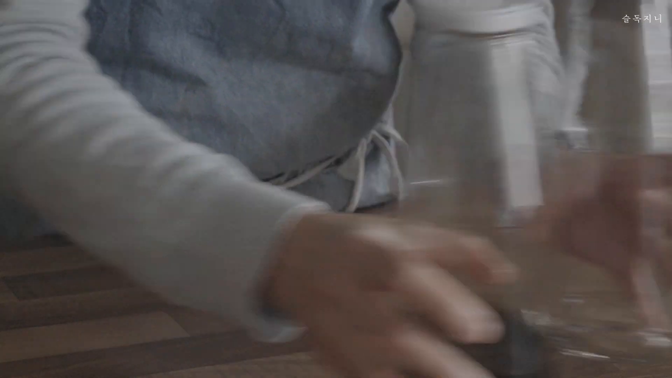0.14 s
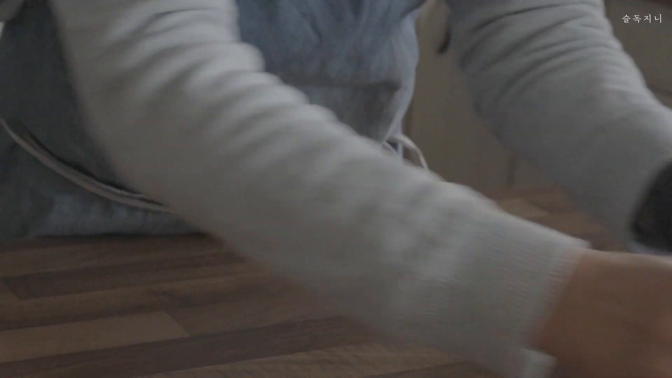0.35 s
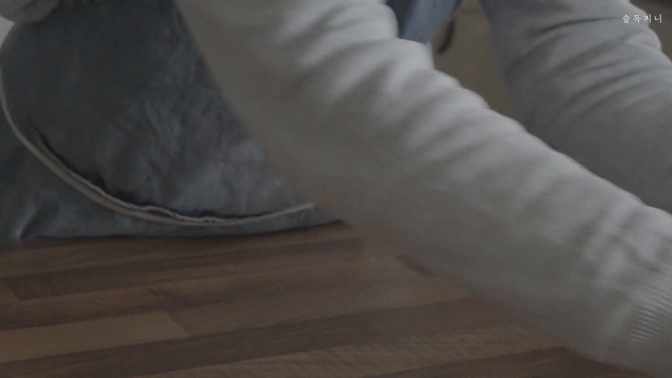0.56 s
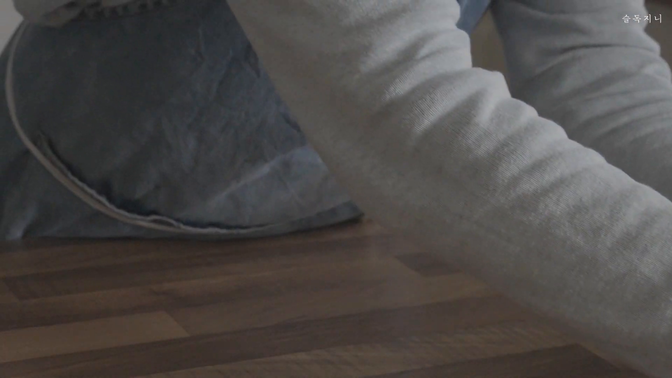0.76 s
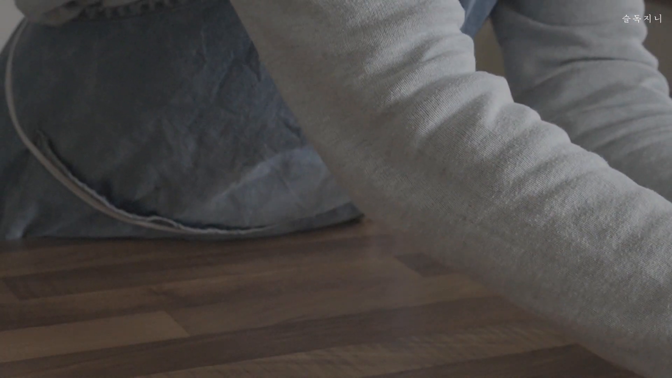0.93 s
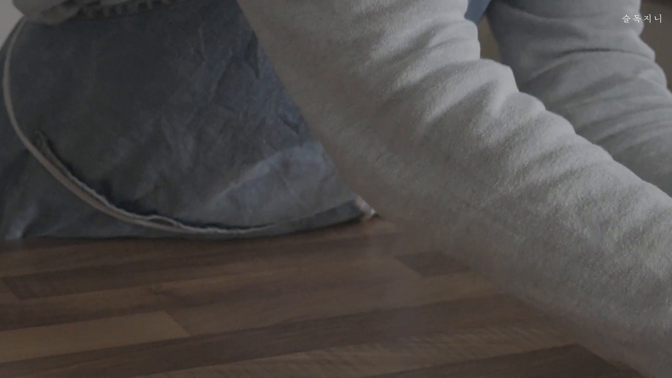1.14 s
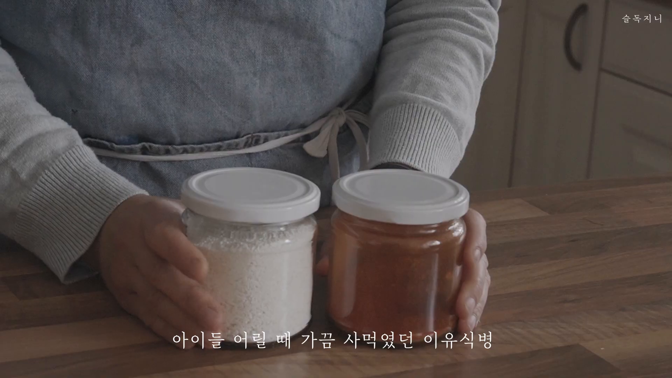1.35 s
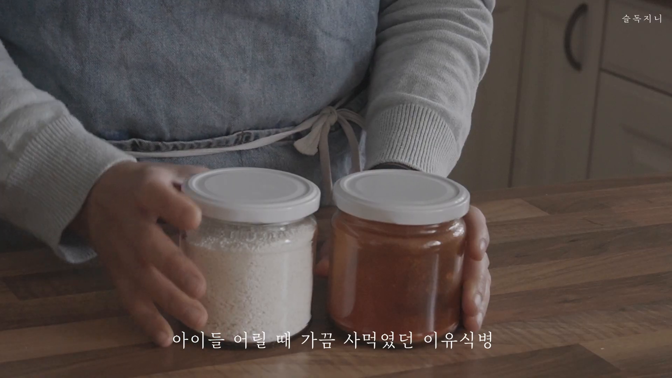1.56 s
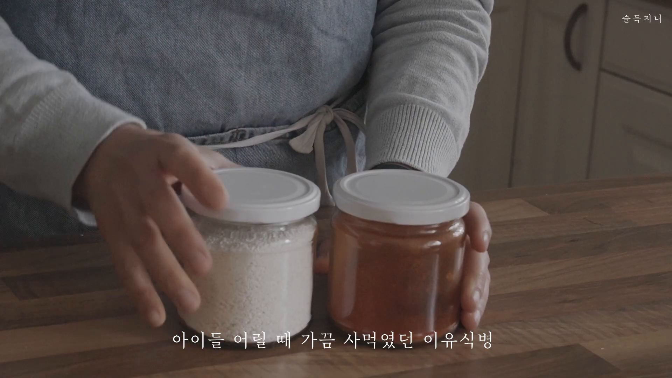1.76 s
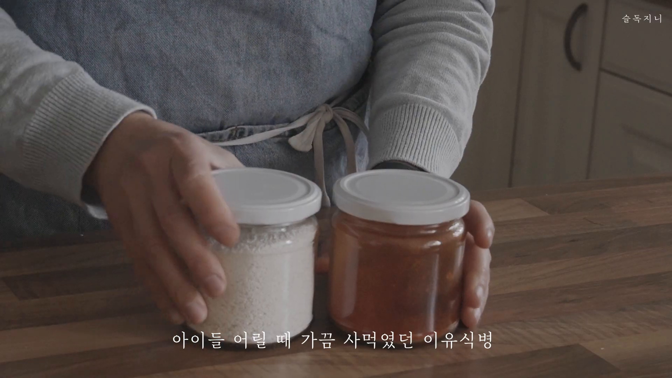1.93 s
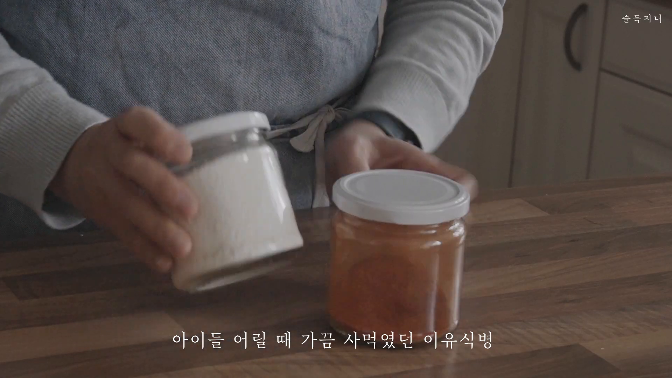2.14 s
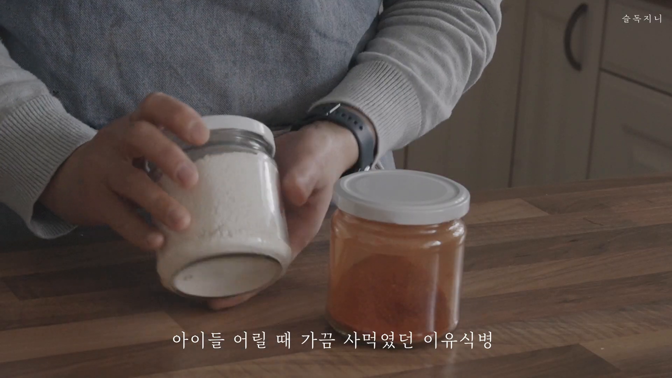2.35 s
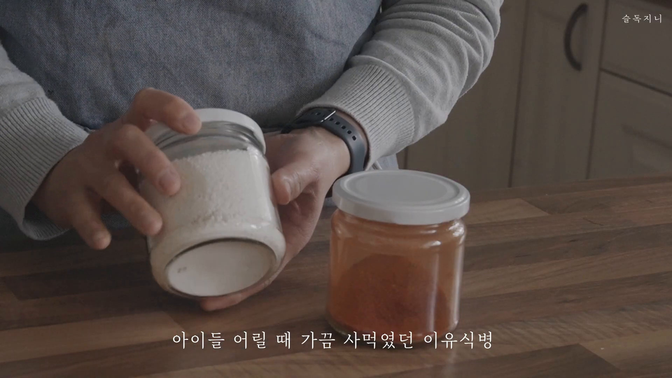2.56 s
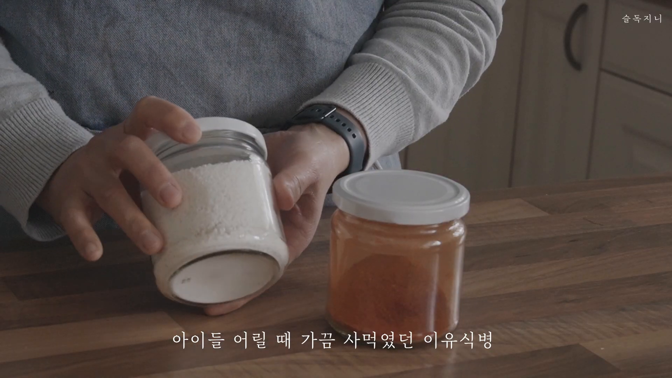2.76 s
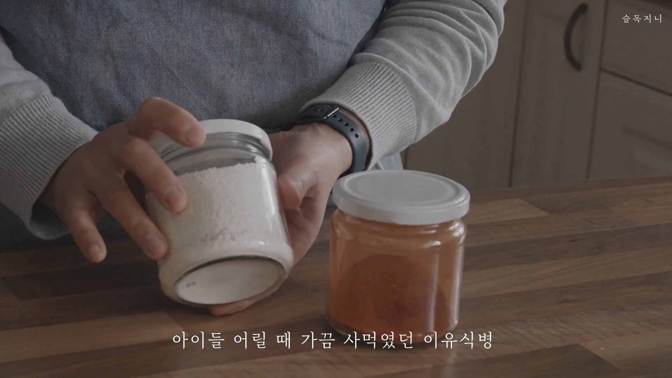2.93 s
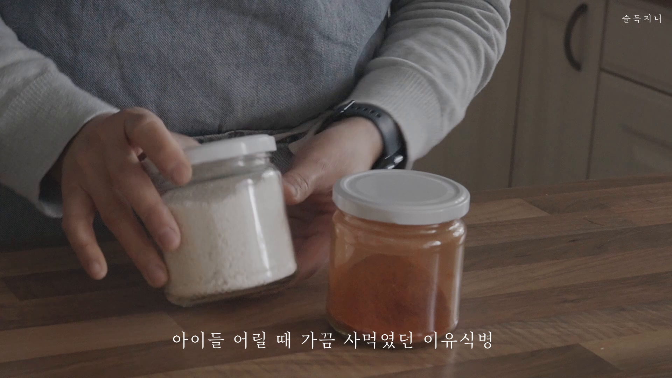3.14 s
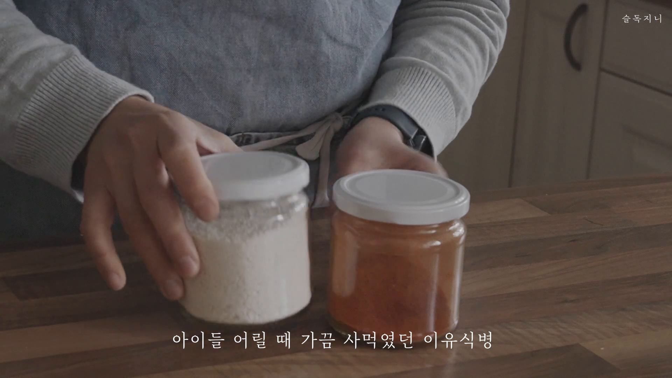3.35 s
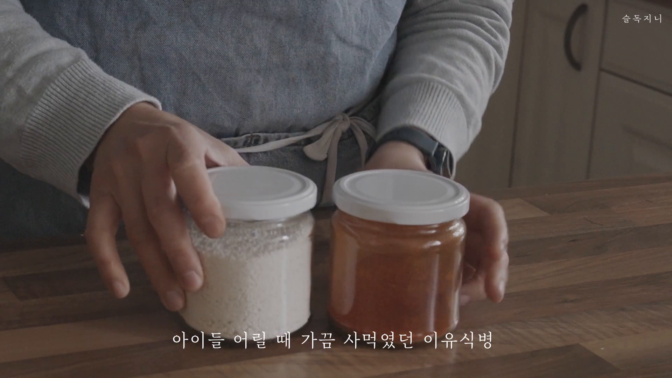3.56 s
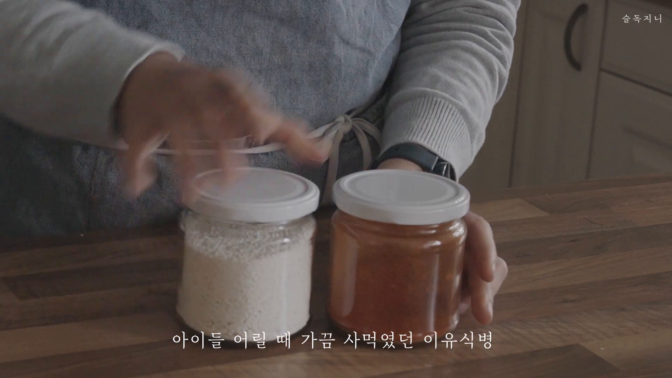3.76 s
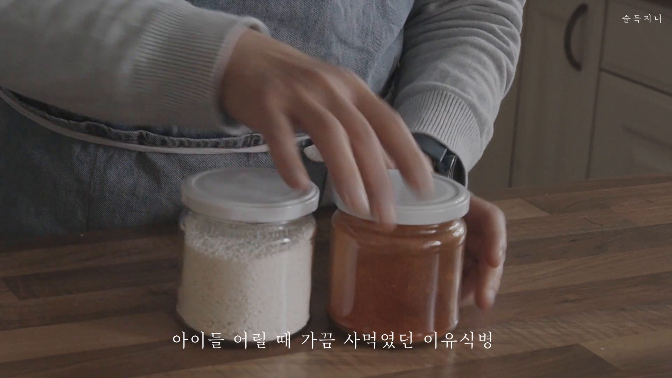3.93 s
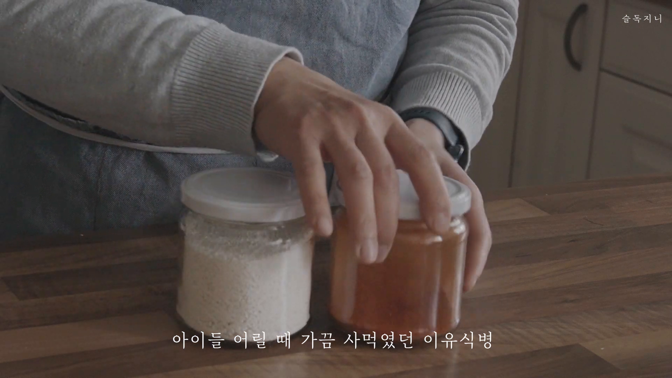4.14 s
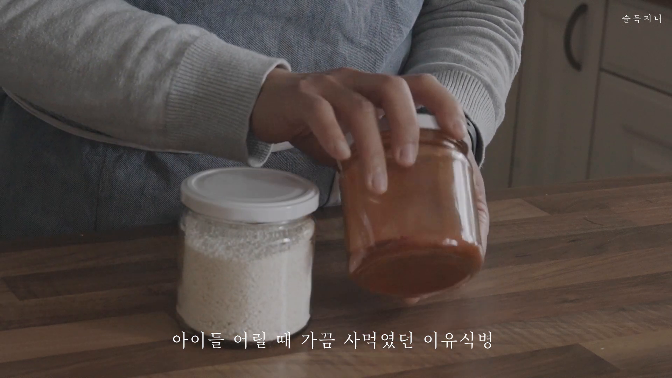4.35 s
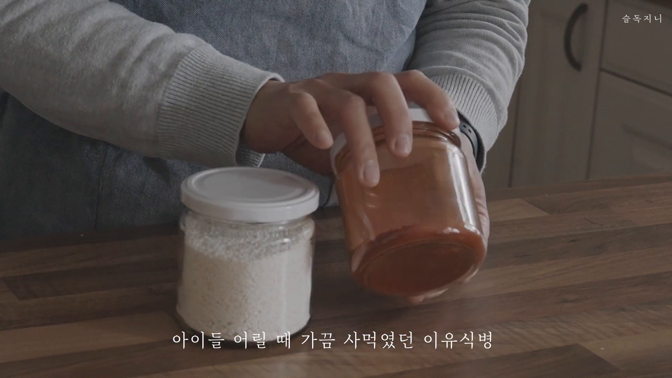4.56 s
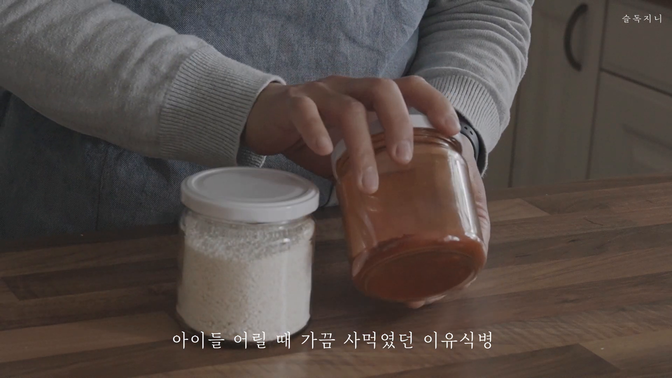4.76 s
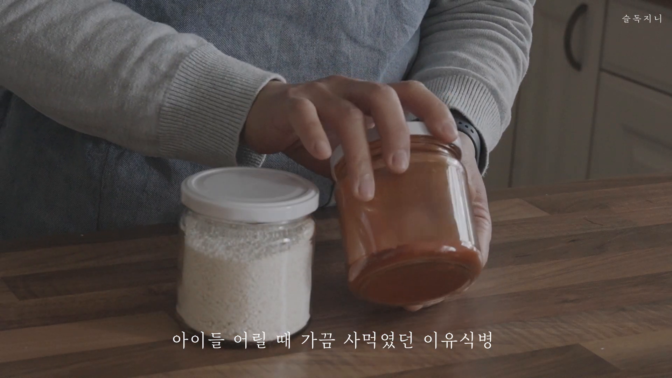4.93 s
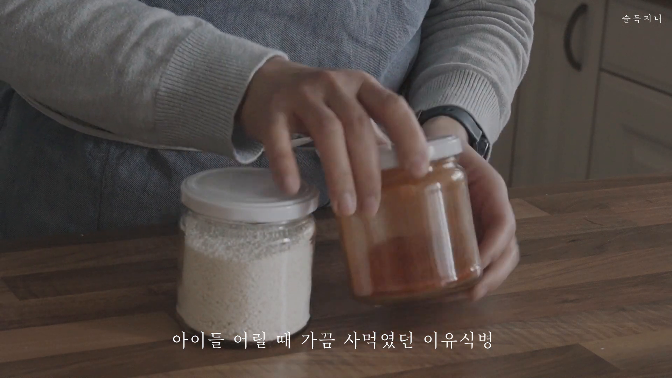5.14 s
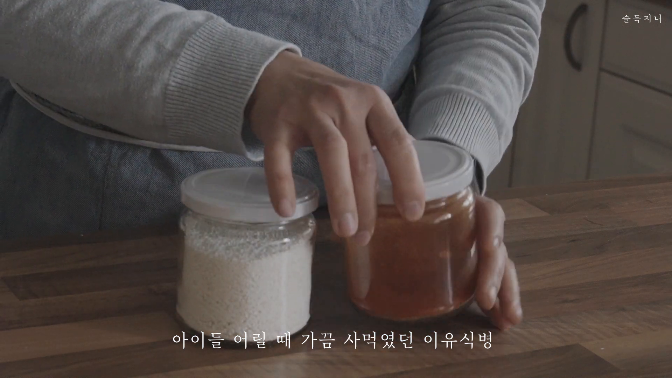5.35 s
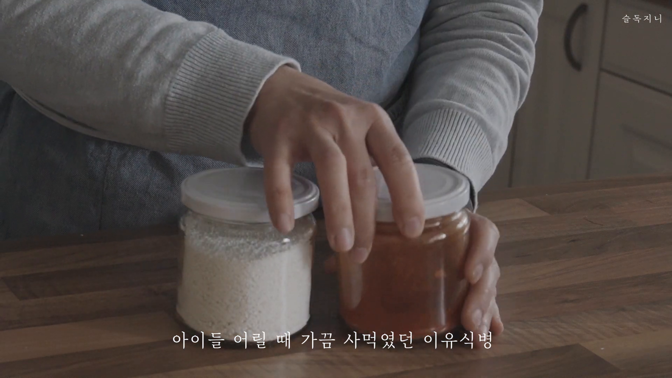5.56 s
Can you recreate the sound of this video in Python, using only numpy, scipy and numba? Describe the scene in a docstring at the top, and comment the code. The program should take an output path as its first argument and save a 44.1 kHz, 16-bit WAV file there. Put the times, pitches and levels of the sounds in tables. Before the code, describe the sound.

Glass bottles are moved and set down on a wooden kitchen counter, close to the microphone. A soft bump and a sleeve swish lead to a cluster of hard knocks, short scrapes and thin clinks. Lighter taps and fingertip brushing follow as a jar is handled. Then come two loud knocks in quick succession, a few softer scrapes and bumps, and faint cloth rustle in the small, quiet room.

```python
"""Glass bottles and jars knock, some hard, and scrape on a wooden kitchen counter, close to the microphone.
They are set down, slid and picked up: each landing thumps the worktop, rings its modes,
fills the small room and rocks to rest. Between landings, glass clinks, fingertips hiss and
sleeves swell with each reach. The hardest knocks overload the microphone; its limiter ducks and recovers.
"""
import sys
import numpy as np
from scipy import signal
from scipy.fft import rfft, irfft
from scipy.io import wavfile
from numba import njit

SR = 44100
rng = np.random.default_rng(int(sys.argv[2]) if len(sys.argv) > 2 else 0)


def waveform_to_disk(signal):
    """Save audio, clipped to [-1, 1], as 16-bit WAV at the path in sys.argv[1]."""
    frames = np.transpose(np.atleast_2d(signal))
    scaled = np.clip(frames, -1, 1) * 32767
    samples = np.round(scaled).astype(np.int16)
    wavfile.write(sys.argv[1], SR, samples)


N = 246959
RING_SIZE = 32768  # samples given to one contact to ring out
TIME, AGE = np.arange(N) / SR, np.arange(RING_SIZE) / SR  # seconds into the scene, into a contact

# modes that a blow on the worktop sets ringing: the worktop and the cupboard under it, with the long ring of a
# bottle near 282 Hz and of a jar near 391 Hz: pitch_hz, level_db, t60_s
RINGING_MODES = [(83, -19, 0.6), (154.6, 6, 0.24), (232, 6, 0.63), (282.4, 3.5, 0.63), (282.7, 7.5, 0.15),
                 (391.3, 10, 0.38), (460, -18, 0.1), (508, 0.5, 0.5), (527, -2, 1), (626, 9, 0.2),
                 (647, 24, 0.36), (720, 2, 0.42), (812, -4, 0.56), (990, 14, 0.36), (910, -13, 0.99),
                 (1250, 5.5, 0.27)]
# spectrum of a hard tap on the wood: frequency_hz, level_db
WOOD_SPECTRUM = [(40, -20), (90, -3.5), (180, -6), (260, 3), (650, 3), (1000, 1.5), (1350, -4),
                 (1700, -8.5), (2250, -3.5), (3000, -15), (4800, -19), (8000, -23), (15000, -46)]
# tone of the kitchen's echoes: frequency_hz, gain_db
ROOM_SPECTRUM = [(60, -0.5), (300, 3), (1000, 2), (1600, -2), (2300, -9), (3200, -3.5), (5000, 4),
                 (14000, 23)]


def undb(db):
    """Decibels to amplitude."""
    return 10 ** (np.asarray(db) / 20)


def unit(x):
    """Scaled to an energy of one."""
    return x / np.sqrt(np.sum(x ** 2))


def read(points, hz):
    """Rows of frequency_hz, value joined by straight lines over log frequency."""
    frequencies, values = np.transpose(points)
    return np.interp(np.log(np.maximum(hz, 1)), np.log(frequencies), values)


def colour(x, spectrum):
    """Filter by rows of frequency_hz, gain_db."""
    return irfft(rfft(x) * undb(read(spectrum, np.fft.rfftfreq(len(x), 1 / SR))), len(x))


def noise(spectrum):
    """Coloured noise of rms one."""
    return unit(colour(rng.standard_normal(N), spectrum)) * np.sqrt(N)


def wander(rate_hz):
    """A random drift with a spread near one."""
    knots = rng.standard_normal(N // 100)
    return np.interp(TIME * rate_hz, np.arange(len(knots)), knots)


def swell(centre_s, length_s):
    """A movement speeds up and slows down again: a bell curve."""
    return np.exp(-2 * ((TIME - centre_s) / length_s) ** 2)


def add(out, start_s, x):
    """Mix x in from start_s."""
    i = max(int(start_s * SR), 0)
    out[i:i + len(x)] += x[:N - i]


def tap(spectrum):
    """The shortest causal pulse that has this spectrum."""
    cepstrum = irfft(np.log(undb(read(spectrum, np.fft.rfftfreq(RING_SIZE, 1 / SR)))))
    cepstrum[1:RING_SIZE // 2] *= 2
    cepstrum[RING_SIZE // 2 + 1:] = 0
    return unit(irfft(np.exp(rfft(cepstrum))))


def fade(t60_s):
    """A decay that loses 60 dB in t60_s."""
    return np.exp(-np.log(1000) * AGE / t60_s)


def modes(table):
    """One fading sine for each mode, as rows."""
    return np.array([undb(db) * np.sin(2 * np.pi * hz * AGE) * fade(t60_s) for hz, db, t60_s in table])


def ring_near(table, pitch_hz, spread_octaves):
    """Modes ringing together, those close to one pitch favoured."""
    octaves_off = np.log2(np.array(table)[:, 0] / pitch_hz)
    return np.exp(-(octaves_off / spread_octaves) ** 2) @ modes(table)


def room_tone(rms_db=-46):
    """Low rumble and steady hiss of the still kitchen."""
    # the quiet room: frequency_hz, level_db
    spectrum = [(10, -40), (22, 7.5), (29, -8), (40, -7.5), (110, -14.5), (180, -11), (300, -18),
                (550, -22.5), (950, -18), (1300, -25), (2800, -33.5), (6000, -37), (11000, -39),
                (15800, -40.5)]
    return noise(spectrum) * undb(rms_db)


def bend(x, lag_s=0.00067, at_hz=1000):
    """Bending waves in the worktop: treble arrives first, the lag going as one over root frequency."""
    hz = np.fft.rfftfreq(2 * len(x), 1 / SR)
    lag_cycles = 2 * lag_s * np.sqrt(hz * at_hz)
    return irfft(rfft(x, 2 * len(x)) * np.exp(-2j * np.pi * lag_cycles))[:len(x)]


def contact(x, cut_hz, body_hz, lift_db):
    """A softer contact cuts the treble; the load and the place of the blow lift one range of the wood."""
    soft = signal.sosfilt(signal.butter(2, cut_hz, fs=SR, output="sos"), x)
    body = signal.lfilter(*signal.iirpeak(body_hz, Q=3.2, fs=SR), soft)
    return soft + undb(lift_db) * body


def room_echoes(build_s=0.0013):
    """The kitchen's answer from one spot: echoes build up, then fade, the top treble first."""
    # reverberation time: frequency_hz, t60_s
    decay_times = [(80, 0.8), (250, 0.31), (700, 0.36), (2000, 0.6), (5000, 0.42), (14000, 0.1)]
    centres_hz = 62.5 * 2. ** np.arange(9)
    hz = np.clip(np.fft.rfftfreq(RING_SIZE, 1 / SR), centres_hz[0], centres_hz[-1])
    band_shares = np.maximum(1 - abs(np.log2(hz / centres_hz[:, None])), 0)
    bands = irfft(rfft(rng.standard_normal(RING_SIZE)) * band_shares)
    tail = np.sum(bands * fade(read(decay_times, centres_hz)[:, None]), axis=0)
    return unit(tail * (1 - np.exp(-AGE / build_s)))


def knock(ring, cut_hz, body_hz, lift_db, ring_db, room_db):
    """One blow on the worktop: a close thump of peak one, the ring of counter and glass, and the room behind
    it."""
    thump = bend(tap(WOOD_SPECTRUM))
    into_room = unit(signal.fftconvolve(thump, tap(ROOM_SPECTRUM))[:RING_SIZE])
    echoes = signal.fftconvolve(into_room, room_echoes())[:RING_SIZE]
    blow = thump + undb(ring_db) * ring + undb(room_db) * echoes
    thump_peak = abs(contact(thump, cut_hz, body_hz, lift_db)).max()
    return contact(blow, cut_hz, body_hz, lift_db) / thump_peak


def landings(crack_db=-6, hard_db=15, crack_growth=0.87, gap_s=0.028, gap_shrink=0.9, soften=0.63):
    """A bottle or jar lands with a thump and a crack, then rocks on its base in four quickening taps."""
    # glass set down: start_s, thump_peak_db, cut_hz, body_hz, lift_db, ring_hz, spread_octaves,
    # ring_db, room_db, first_rock_drop_db, rocking_loss_db_per_s
    set_downs = [ (0.004, -14, 650, 155, 6.5, 196, 1.1, 2, 2.5, 14.5, 494),
                 (0.9475, 8, 1280, 472, 4.5, 420, 0.23, -9, 1, 15.5, 76),
                 (1.1481, -1, 840, 310, 7.5, 295, .2, -4, -2.5, 14, 200),
                 (1.3623, 6, 1400, 450, 0, 930, 0.8, -7.5, -3, 21.5, 398),
                 (3.519, 12.5, 1880, 780, -1, 740, 0.54, -11, -1, 21.5, 137),
                 (3.6513, 9, 2350, 660, 5, 620, 0.1, -8.5, -4, 12, 359),
                 (4.1797, -6, 820, 230, 10, 390, .1, -13.5, -12.5, 30, 297), ]
    # modes of the thick glass base: pitch_hz, level_db, t60_s
    base_modes = [(804, -1, 0.01), (1380, -20.5, 0.0065), (2105, 6, 0.011), (2380, -7, 0.021),
                  (4940, -8.5, .004), (7700, -34, 0.0053)]
    out = np.zeros(N)
    base = bend(modes(base_modes).sum(axis=0))
    rock_delays_s = np.cumsum(gap_s * gap_shrink ** np.arange(4))
    for start_s, db, cut_hz, body_hz, lift_db, ring_hz, spread, ring_db, room_db, drop, loss in set_downs:
        ring = unit(ring_near(RINGING_MODES, ring_hz, spread))
        # the contact stiffens with force, so the glass speaks more in a hard landing
        crack = base / abs(base).max() * undb(crack_db + crack_growth * min(db - hard_db, 0))
        add(out, start_s, undb(db) * (knock(ring, cut_hz, body_hz, lift_db, ring_db, room_db) + crack))
        for delay_s in rock_delays_s:
            rock = knock(ring, cut_hz * soften, body_hz, lift_db, ring_db + 2, room_db + 3)
            add(out, start_s + delay_s, undb(db - drop - loss * (delay_s - gap_s)) * rock)
    return out


def scrapes(uneven=0.32, scatter_db=4, grit_db=-27, room_db=-7):
    """A glass base dragged over wood sticks and slips unevenly, and every slip taps the jar."""
    # drags: start_s, length_s, direct_rms_db, slips_per_s, cut_hz, body_hz, lift_db
    drags = [ (0.032, 0.04, -32.5, 285, 6000, 1390, 4), (0.969, 0.024, -28.5, 240, 4000, 2300, -5),
             (1.136, 0.064, -28.5, 250, 2210, 636, 15), (1.34, 0.037, -26.5, 230, 1200, 430, 13),
             (1.878, 0.034, -26, 190, 2250, 166, 11), (1.979, 0.013, -30.5, 390, 2380, 307, 15),
             (3.971, 0.028, -37.5, 220, 700, 350, -2), (4.076, 0.049, -25.5, 290, 1810, 505, 13.5),
             (4.148, 0.049, -27.5, 312, 2370, 430, 7), ]
    # modes of a jar held in the hand: pitch_hz, level_db, t60_s
    jar_modes = [(161.6, 5, 0.023), (351, -34, 0.14), (480, 7, 0.018), (630, -3.5, 0.046),
                 (795, 6.5, 0.014), (930, -0.5, 0.039), (1547, 1.5, 0.026), (1810, 3, 0.023),
                 (2100, 10.5, 0.0051), (2460, -4.5, 0.019), (2840, 3, 0.012), (3270, 4.5, 0.0096),
                 (3880, 4.5, 0.0063), (4670, -6, 0.034)]
    out = np.zeros(N)
    jar = unit(modes(jar_modes).sum(axis=0))
    for start_s, length_s, db, slips_per_s, cut_hz, body_hz, lift_db in drags:
        timing, strength = rng.standard_normal((64, 2)).T
        gaps_s = np.exp(uneven * timing) / slips_per_s
        slip_times_s = np.cumsum(gaps_s) - gaps_s[0] / 2
        slips = np.bincount((slip_times_s * SR).astype(int), undb(scatter_db * strength), RING_SIZE)
        pressure = np.sqrt(np.maximum(np.sin(np.pi * np.minimum(AGE / length_s, 1)), 0))
        force = pressure * (slips[:RING_SIZE] + undb(grit_db) * rng.standard_normal(RING_SIZE))
        direct = unit(contact(signal.fftconvolve(force, jar)[:RING_SIZE], cut_hz, body_hz, lift_db))
        room = colour(room_echoes(), ROOM_SPECTRUM)[:RING_SIZE // 2]
        echoes = signal.fftconvolve(direct, room)[:RING_SIZE]
        add(out, start_s, (direct + undb(room_db) * echoes) * undb(db) * np.sqrt(length_s * SR))
    return out


def fingertips(arms, brush_s=0.06, hand_db=-5, grain_db=1.8):
    """Dry fingertips hiss over glass and lids, and the hands hiss along with each reach."""
    # finger strokes: fastest_s, rms_db
    strokes = [(0.059, -42), (1.245, -48), (2.025, -50.5), (2.68, -57), (3.07, -52.5), (3.49, -55),
               (3.99, -57), (5.3, -55), (5.42, -53.5)]
    # sliding skin: frequency_hz, level_db
    spectrum = [(500, 1.5), (4000, -16), (8000, -10.5), (10500, -19), (13000, -15.5), (16000, -25)]
    fingers = sum(undb(db) * swell(fastest_s, brush_s) for fastest_s, db in strokes)
    return noise(spectrum) * np.hypot(fingers, undb(hand_db) * arms) * undb(grain_db * wander(120))


def arm_movement():
    """Level of the rustle as the arms reach; overlapping reaches add in power."""
    # reaches: fastest_s, length_s, rms_db
    reaches = [(0.45, 0.58, -43), (1.238, 0.55, -50), (2.06, 0.48, -47), (2.365, 0.12, -42.5),
               (2.557, 0.64, -54.5), (3.267, 0.36, -47.5), (4.05, .55, -48.5), (5.226, 0.24, -49),
               (5.44, 0.22, -53.5)]
    return np.sqrt(sum((undb(db) * swell(fastest_s, length_s)) ** 2 for fastest_s, length_s, db in reaches))


def sleeves(arms, flutter_db=0.6):
    """Knitted sleeves brush the apron as the arms move."""
    # rubbing cloth: frequency_hz, level_db
    spectrum = [(100, -27), (300, -6), (600, 5), (1000, -1.5), (1500, -1.5), (2400, -4), (3500, -7),
                (6000, -13), (8500, -15.5), (10500, -26), (15000, -44.5)]
    return noise(spectrum) * arms * undb(flutter_db * wander(40))


def clinks(spread_octaves=0.38, rub_s=0.0073):
    """A short rub wakes the thin, high modes of the glass near one pitch."""
    # light rubs: start_s, gain_db, pitch_hz
    rubs = [(0.973, -54, 13200), (0.987, -46, 6860), (1.026, -53, 7050), (1.147, -58, 7100),
            (1.175, -51, 6000), (1.209, -52, 8800), (1.235, -55, 6040), (1.859, -44.5, 3870),
            (1.947, -49, 4000), (2.62, -60, 8300), (4.051, -55, 5260)]
    # high modes of the glass: pitch_hz, level_db, t60_s
    glass_modes = [(3900, 0, .06), (4090, -4, .06), (5360, -3, .12), (5800, -2, .12), (6090, -3, .12),
                   (6730, 0, .12), (7390, -6, .25), (7455, -7, .15), (8300, -5, .2), (8770, -2, .2),
                   (13200, -4, .2)]
    out = np.zeros(N)
    for start_s, db, pitch_hz in rubs:
        rub = unit(rng.standard_normal(RING_SIZE) * np.exp(-AGE / rub_s))
        ring = ring_near(glass_modes, pitch_hz, spread_octaves)
        add(out, start_s, undb(db) * signal.fftconvolve(rub, ring))
    return out


def nudges(spread_octaves=0.29):
    """A jar nudged, gripped or tipped gives the worktop a single lighter knock."""
    # light knocks: start_s, thump_peak_db, cut_hz, body_hz, lift_db, ring_db, room_db
    touches = [ (0.987, -2.5, 750, 319, 6, 3, -1), (1.027, -4, 810, 290, -10, 5, -8),
               (1.0885, -11.5, 740, 232, -9, 5, 1), (1.1755, -3.5, 1130, 530, 11.5, -11, -11.5),
               (1.3554, -6.5, 940, 396, 4, -9.5, -1), (1.884, -13.5, 1290, 670, 20, -11, 0.5),
               (1.897, -17, 1280, 196, 11, -32, -22), (1.983, -17.5, 1180, 302, 18, -18, -19),
               (2.699, -20, 6000, 1230, 6, -22, -10), (4.0793, -34, 950, 487, 23, 5, 7),
               (4.151, -16.5, 1100, 405, 7, 1.5, 1.5), (4.19, -10.5, 1410, 396, -1, -3.5, -14),
               (4.243, -33.5, 500, 390, 13, 7, -18), ]
    out = np.zeros(N)
    for start_s, db, cut_hz, body_hz, lift_db, ring_db, room_db in touches:
        ring = unit(ring_near(RINGING_MODES, body_hz, spread_octaves))
        add(out, start_s, undb(db) * knock(ring, cut_hz, body_hz, lift_db, ring_db, room_db))
    return out


def scene():
    """Glass, hands and room as they reach one microphone close to the counter."""
    glassware = landings() + nudges() + scrapes() + clinks()
    arms = arm_movement()
    return (glassware + sleeves(arms) + fingertips(arms) + room_tone())[None]


@njit
def follow(x, attack_s, release_s):
    """Peak level that rises fast and falls slowly."""
    attack, release = 1 - np.exp(-1 / (attack_s * SR)), 1 - np.exp(-1 / (release_s * SR))
    level, held = np.empty(len(x)), 0.
    for i in range(len(x)):
        held += (abs(x[i]) - held) * (attack if abs(x[i]) > held else release)
        level[i] = held
    return level


def record(dry, limit_db=-3.5, attack_s=0.00066, release_s=0.029, ceiling=0.99, top_hz=15850):
    """The limiter is a moment late, so hard knocks clip before it ducks; then the top is cut."""
    level = follow(dry[0], attack_s, release_s)
    ducked = dry / np.maximum(level / undb(limit_db), 1)
    clipped = ducked / (1 + (ducked / ceiling) ** 4) ** (1 / 4)
    return signal.sosfilt(signal.ellip(8, .2, 70, top_hz, fs=SR, output="sos"), clipped)


dry = scene()
out = record(dry)
waveform_to_disk(out)
```